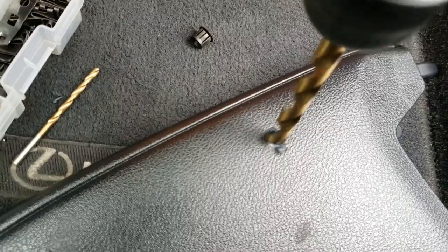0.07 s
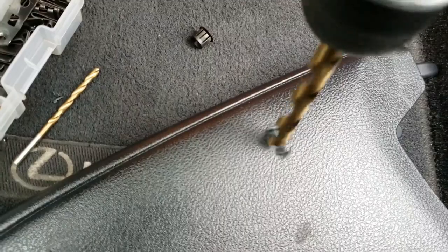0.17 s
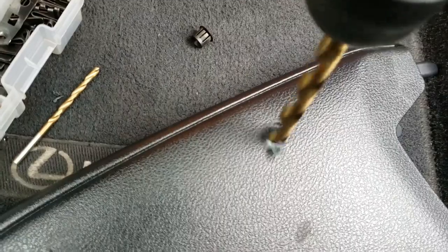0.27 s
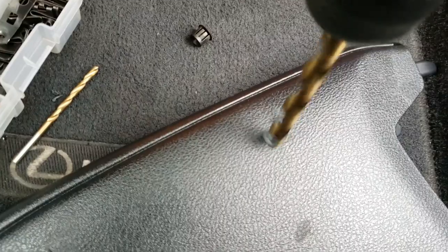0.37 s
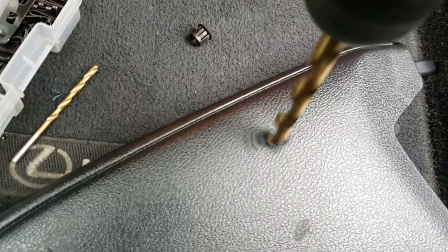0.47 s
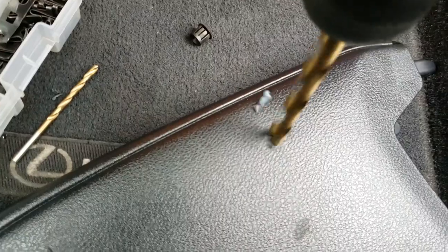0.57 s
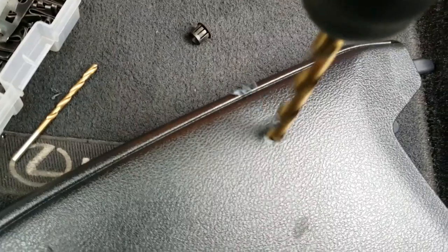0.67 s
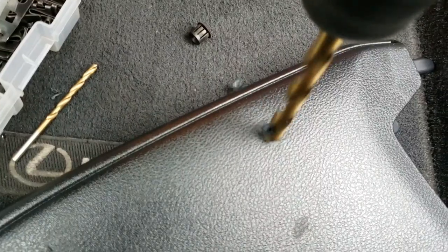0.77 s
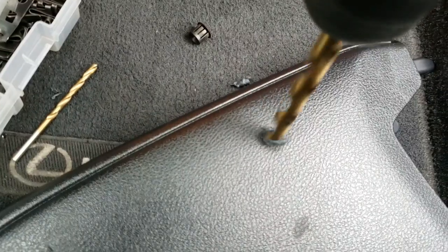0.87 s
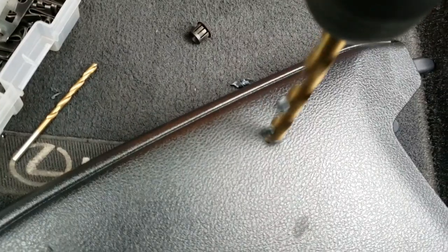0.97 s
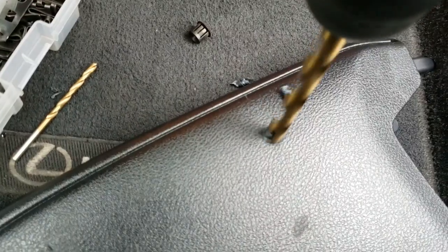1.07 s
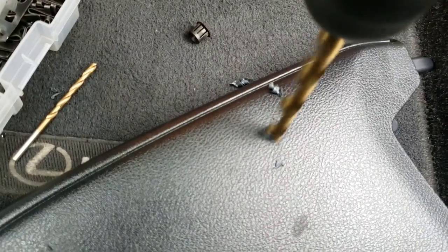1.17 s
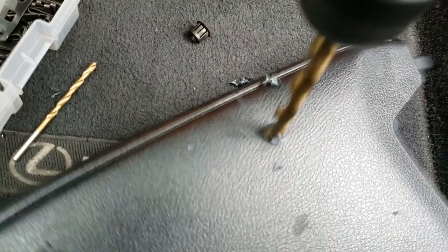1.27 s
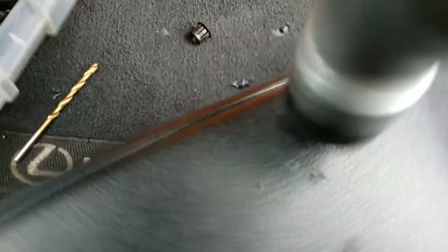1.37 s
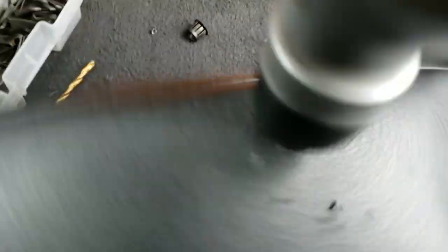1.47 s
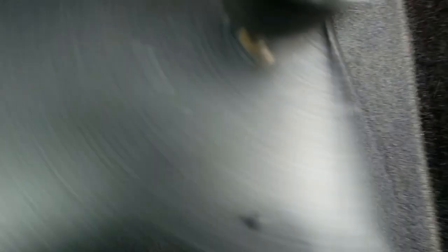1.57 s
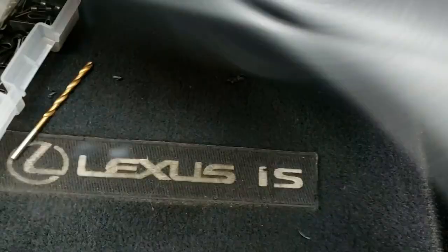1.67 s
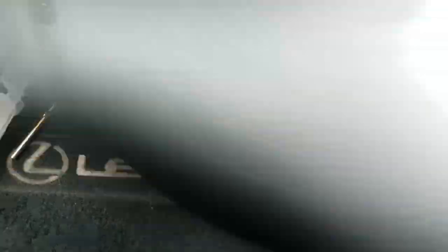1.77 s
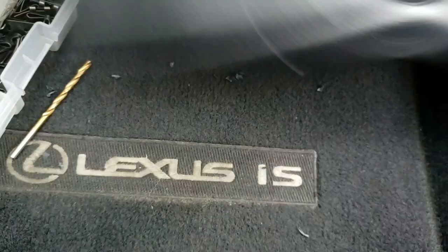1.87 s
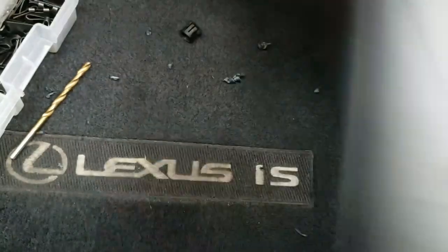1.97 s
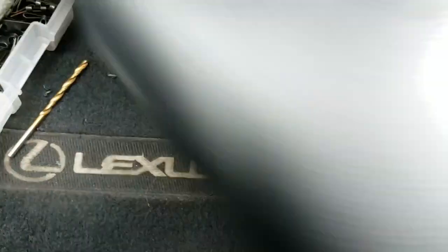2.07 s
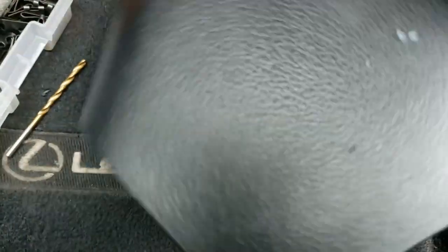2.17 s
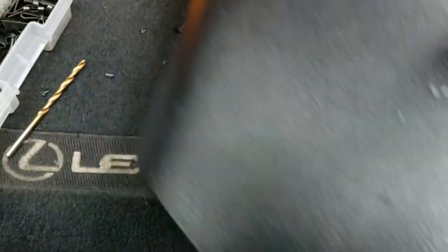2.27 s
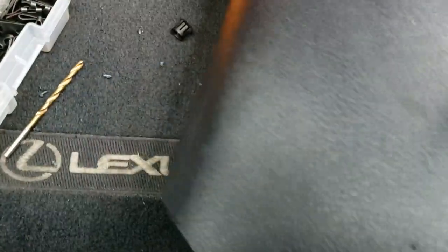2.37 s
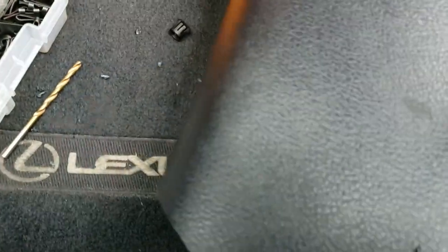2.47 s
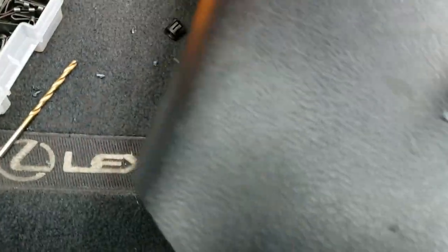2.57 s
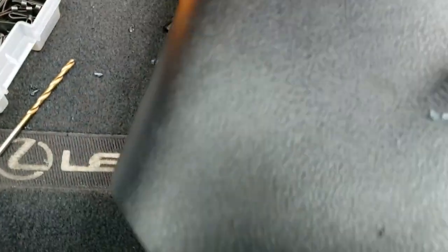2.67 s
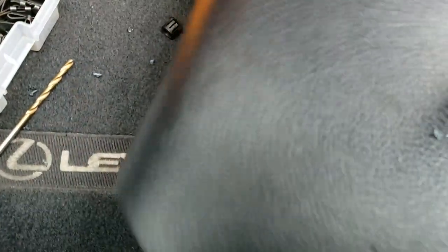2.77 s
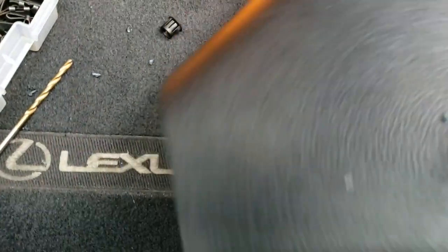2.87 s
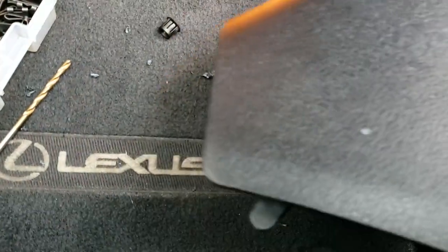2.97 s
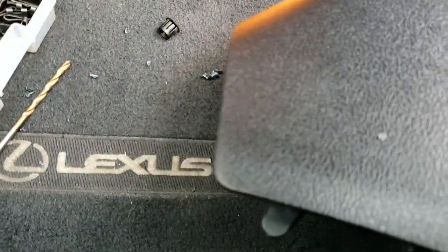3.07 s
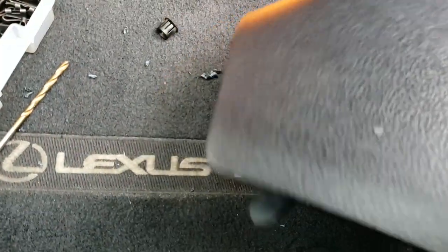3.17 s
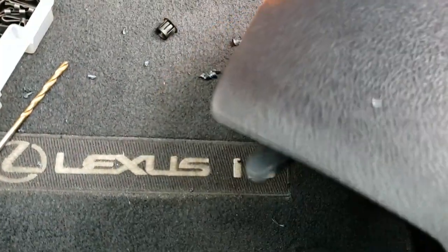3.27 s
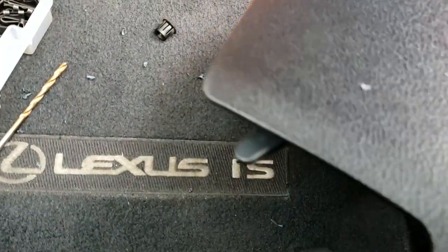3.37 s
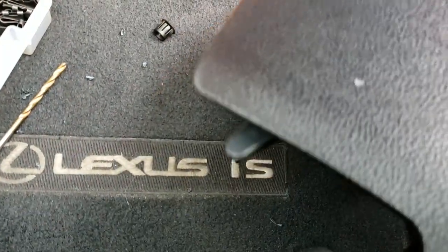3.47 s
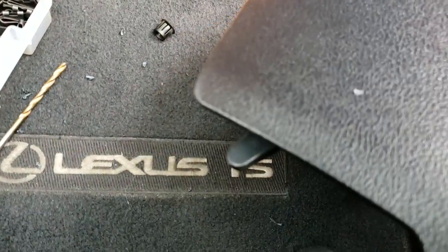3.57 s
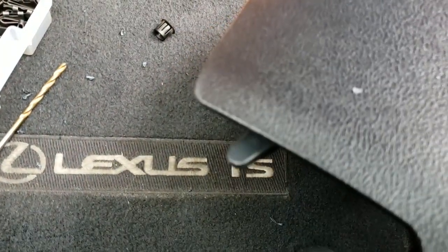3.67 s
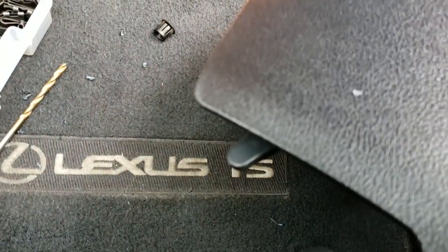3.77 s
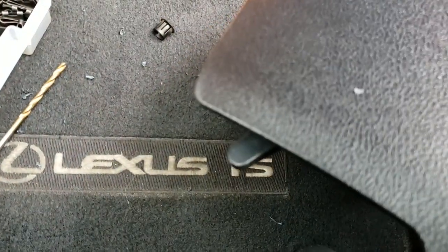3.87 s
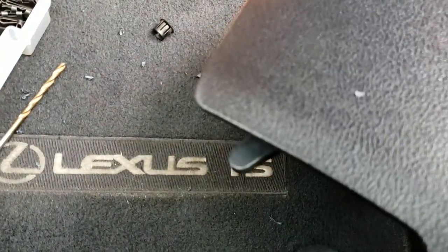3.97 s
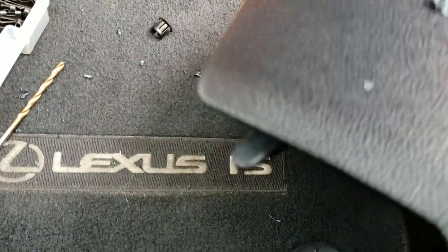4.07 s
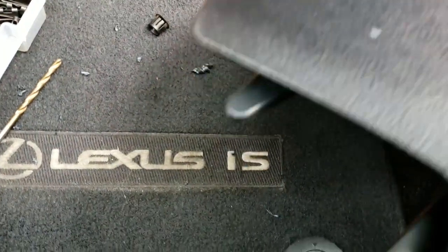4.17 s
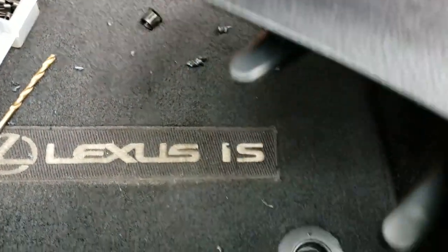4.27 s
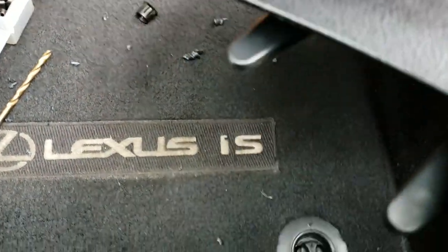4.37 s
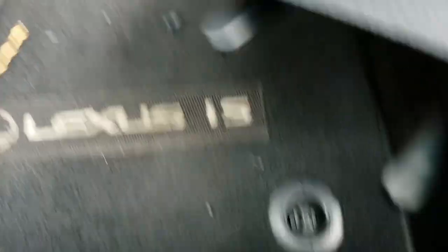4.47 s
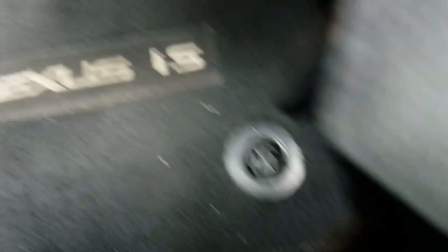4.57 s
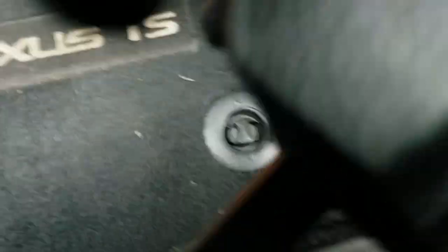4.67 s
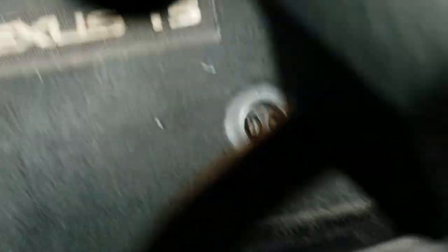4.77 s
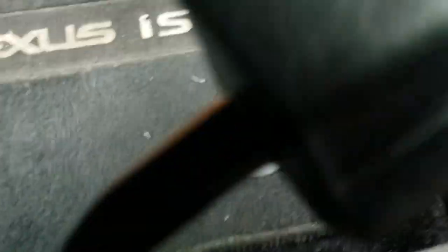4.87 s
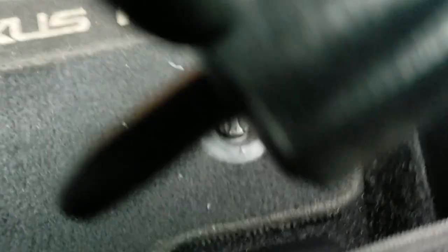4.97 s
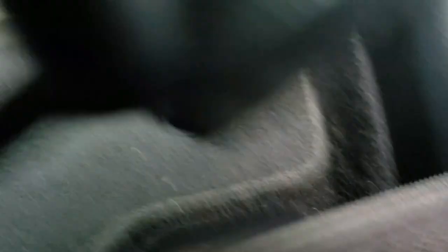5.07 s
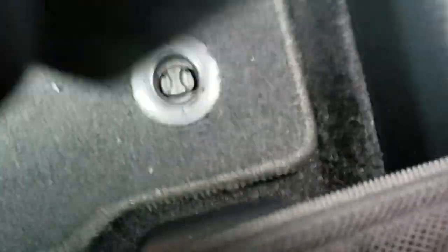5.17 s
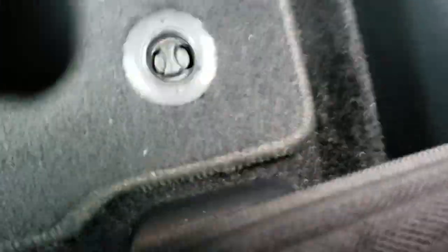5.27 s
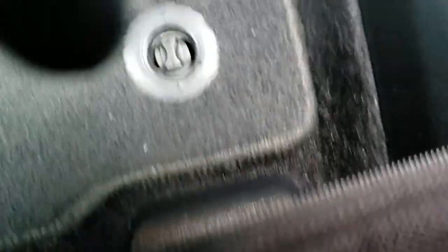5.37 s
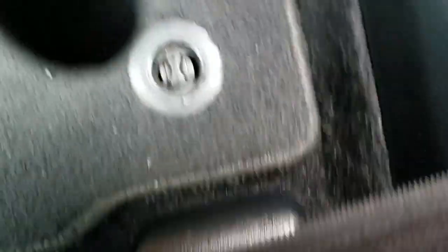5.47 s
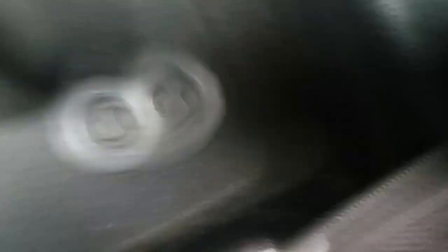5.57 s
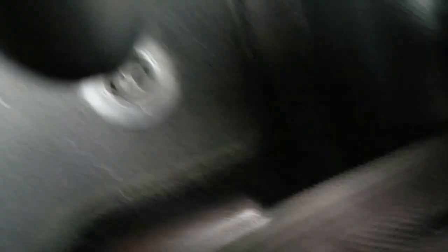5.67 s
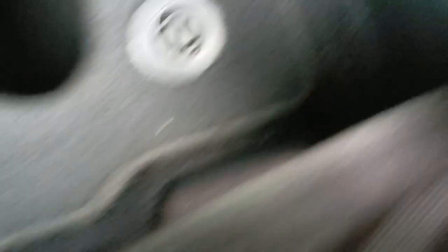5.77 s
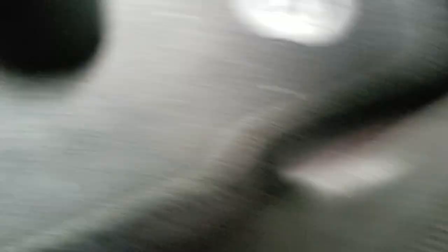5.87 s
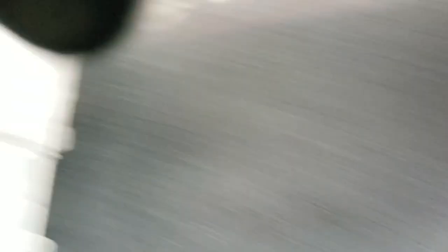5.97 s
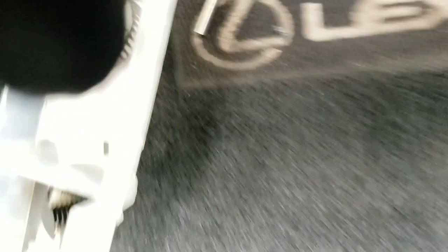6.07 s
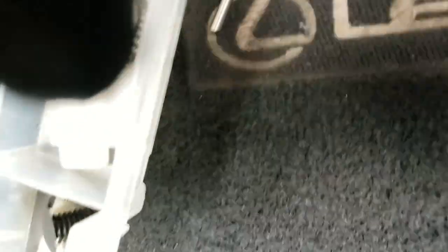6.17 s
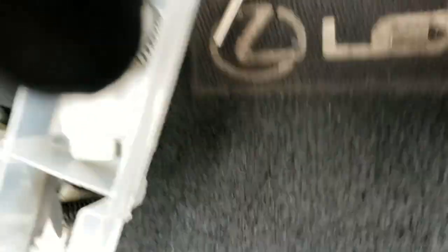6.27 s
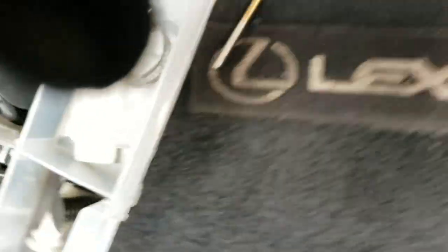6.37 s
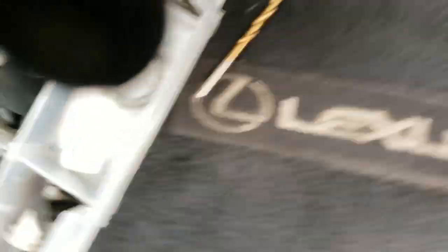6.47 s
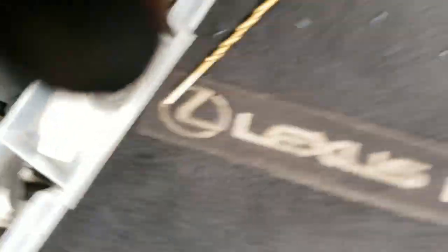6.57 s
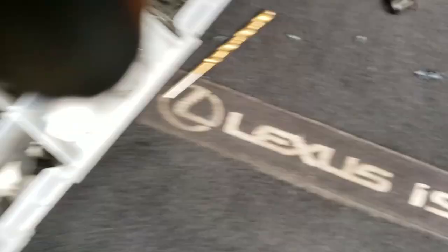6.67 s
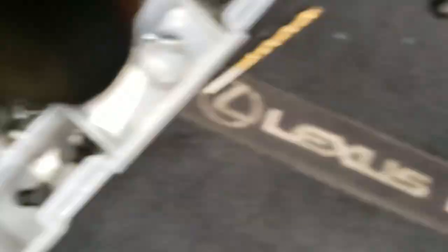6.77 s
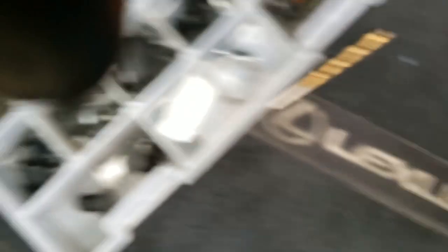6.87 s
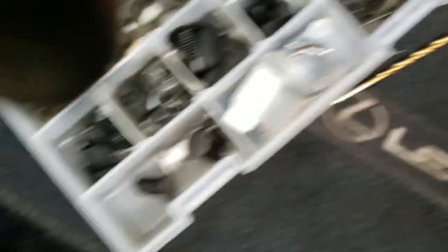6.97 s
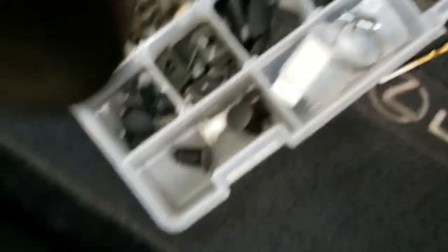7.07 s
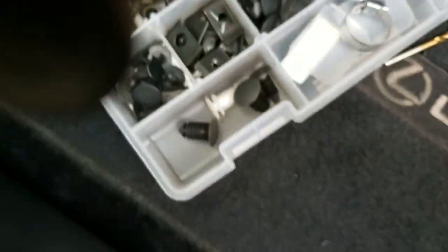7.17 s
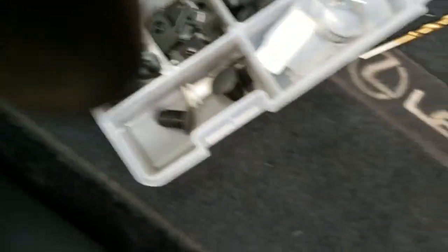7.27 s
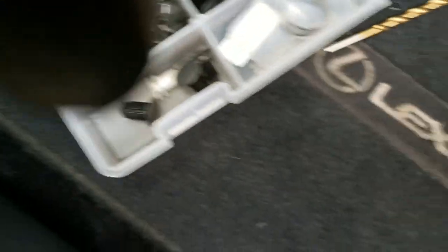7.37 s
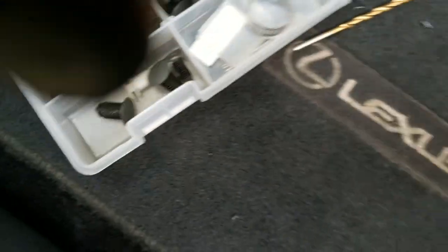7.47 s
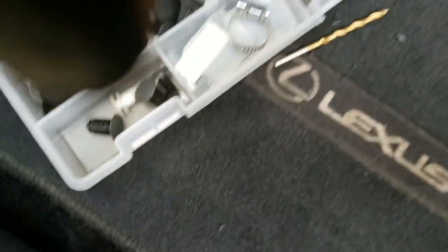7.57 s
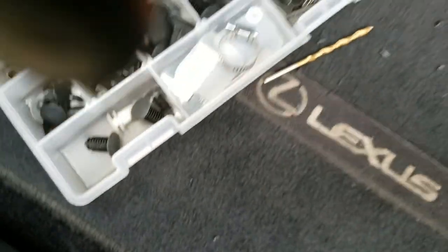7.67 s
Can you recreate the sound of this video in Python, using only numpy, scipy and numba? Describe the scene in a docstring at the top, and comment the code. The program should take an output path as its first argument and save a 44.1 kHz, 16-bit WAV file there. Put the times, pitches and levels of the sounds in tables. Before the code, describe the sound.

A drill bit chews plastic with rough crackling chips and gear rattle, air buffeting the nearby microphone. Hard plastic snaps follow as the load comes off, and the whine slides down to rest. Tiny buzzing clicks and a low grind lead into a longer free-spinning rev, a quick retrigger and a slow coast. A short burst with a knock comes later, then box rattling and one last abrupt rev, in a dry indoor space.

```python
"""A corded drill bores a plastic trim panel, coasts down, and is then revved several more times close by.
Gear rattle and hiss are noise pulsed by the turning teeth and commutator; gear tones are motor orders
swept through housing resonances. Random jerks ring the bit, the shaft squeals, fan air buffets the microphone.
Between runs, current pulses tick in the stalled motor and a slow crawl grinds.
Plastic knocks are noise cracks with damped modes, over a low hum, room noise and rustling."""
import sys
import numpy as np
from scipy import signal
from scipy.fft import rfft, irfft, next_fast_len
from scipy.io import wavfile
from scipy.ndimage import uniform_filter1d
from numba import njit

SR = 44100
rng = np.random.default_rng(int(sys.argv[2]) if len(sys.argv) > 2 else 0)


def wrap_up_sound(samples):
    """Save the sound to the file named by the first command line argument, as 16-bit audio."""
    columns = np.atleast_2d(samples).T
    # keep every value between -1 and 1, then stretch to whole-number steps
    tamed = np.clip(columns, -1, 1)
    steps = np.round(tamed * 32767).astype(np.int16)
    wavfile.write(sys.argv[1], SR, steps)


N = 339570
TIME_S = np.arange(N) / SR

# Levels in tables are relative unless a comment says otherwise.
# Room floor spectrum: (frequency [Hz], level per Hz [dB])
ROOM_SPECTRUM = [(12, -40), (20, -17.5), (49, -9.5), (88, -10.5), (107, -12), (123, -18), (241, -20.5),
                 (277, -31.5), (357, -25.5), (446, -36), (1120, -41), (1440, -40.5), (2080, -48),
                 (3000, -44.5), (4500, -60.5), (8650, -57), (16000, -56)]
# Hands on panel and parts box: (time [s], level [dB])
RUSTLE_LEVEL = [(4.95, -70.5), (5.18, -63), (6.3, -67), (6.5, -62.5), (6.7, -58), (6.95, -54),
                (7.05, -57.5), (7.18, -49.5), (7.33, -45.5), (7.42, -50.5)]
# Rustle spectrum: (frequency [Hz], level per Hz [dB])
RUSTLE_SPECTRUM = [(400, 3), (800, 0.5), (1200, -1), (2000, -3.5), (3000, 1), (5000, -5.5), (9000, -11),
                   (15000, -5.5)]

# Bumps through the hand to the microphone: (time [s], level [dB], frequency [Hz], t60 [s])
MIC_BUMPS = [(5.58, -12, 42.7, 0.087), (7.241, -19, 123, 0.022)]
# Plastic knocks: (time [s], clack [dB], clack tilt [dB/octave], snap [dB], thump [dB], L-R [dB])
PLASTIC_KNOCKS = [(1.592, -19, -6, -10, -33, 12), (1.689, -28, 5, -19, -44, 1),
                  (1.753, -21, -4, -18.5, -39, 8), (2.03, -31.5, -7, -53, -40, 1),
                  (2.957, -39.5, 6, -41, -56, -3), (3.306, -47, 3, -40, -51, -7),
                  (3.327, -40, -5, -40, -51, -3), (5.5766, -9.5, -0.5, -19, -22.5, -13),
                  (5.591, -13.5, -5, -23, -39, -2), (6.752, -35, 4, -43, -48, 2),
                  (6.8338, -22.5, -7, -16.5, -37, 6), (6.84, -18.5, -5.5, -27, -26.5, -3),
                  (6.875, -31, -6, -35.5, -33.5, 2), (6.976, -40, 0, -54, -50, 0),
                  (7.095, -53, -3, -43, -49, 1), (7.2314, -12, -6, -28, -28.5, 1.5),
                  (7.251, -18, -5.5, -37, -59, -3), (7.268, -20, 2, -35, -56, 14),
                  (7.275, -20, -2, -34, -62, 9), (7.291, -15.5, 0, -29.5, -39, 4)]
# Low panel modes: (frequency [Hz], level [dB], t60 [s])
PANEL_MODES = [(48, -19, 0.21), (102.2, 3, 0.23), (137.6, -3, 0.15), (186.6, 4.5, 0.09), (275, -3.5, 0.14),
               (396, -9, 0.081), (550, -16, 0.075), (595, -13, 0.12)]
# Hard, short upper modes of the plastic: (frequency [Hz], level [dB], t60 [s])
CLACK_MODES = [(372, -12, 0.028), (653, 2, 0.015), (953, -1, 0.02), (1380, -7, 0.032), (1750, -10.5, .02),
               (2440, -7, 0.013), (2980, 5, 0.014), (3450, -19, .016), (4020, -16, 0.012),
               (5030, -23, 0.02)]
# Broad crack of a blow: (frequency [Hz], level per Hz [dB])
SNAP_SPECTRUM = [(500, 2.5), (950, 1.5), (1300, -1.5), (1800, 5.5), (2100, 1), (2900, 6.5), (4000, 1.5),
                 (5000, -1), (5800, -9.5), (7600, -4.5), (9000, -12.5), (14000, -7)]
SNAP_T60_S, SNAP_TAIL_T60_S, SNAP_TAIL_DB = 0.026, 0.19, -20
CONTACT_S, CONTACT_RISE_DB = 0.0012, 0.5  # mean spacing; rise from one contact to the next

MAINS_HZ = 60
MAINS_PHASE_CYCLES = .44  # where the current peaks
# Runs of motor ticks at about mains rate: (first [s], last [s], level [dB])
TICK_RUNS = [(2.690, 2.690, -37), (2.7065, 2.7395, -29), (3.040, 3.189, -27), (5.174, 5.191, -37),
             (7.408, 7.424, -28)]
# Tick spectrum: (frequency [Hz], level per Hz [dB])
TICK_SPECTRUM = [(400, -7), (800, 1), (1900, -37), (2450, 0), (3000, 13), (4500, 1.5), (7500, 2.5),
                 (9000, -0.5), (12000, 7.5), (15000, 9.5)]
# Motor straining at a crawl: (time [s], level [dB])
STRAIN_LEVEL = [(2.7, -67.5), (2.86, -50.5), (3.0, -62), (3.1, -60), (3.3, -51), (3.45, -45), (3.55, -54)]
# Motor body resonances: (frequency [Hz], width per pass [Hz], level [dB])
BODY_MODES = [(320, 150, 13), (625, 320, 10), (1530, 400, 1.5), (2920, 320, 0.5)]
# Modes excited by mains pulses: (frequency [Hz], width per pass [Hz], level [dB])
HUM_MODES = [(368, 52, -68), (873, 67, -69)]
HUM_START_S, HUM_END_S = 2.69, 3.32
GRIND_PER_S, GRIND_T60_S = 130, 0.017
GRIND_SMOOTH = .5  # even grinding, as a share of the tooth ticks' rms

# Fan air over the microphone: (from [s], to [s], buffet [dB], rush [dB], L-R [dB])
AIR_GUSTS = [(0.0, 0.49, -28, -43.5, 2), (0.466, 1.568, -25, -39, 12), (1.246, 1.364, -19, -29, 22),
             (1.505, 1.56, -30, -28.5, 24), (3.414, 3.72, -35.5, -39, -20), (3.691, 3.755, -30.5, -26, -31),
             (3.766, 3.993, -56, -25.5, -37), (3.964, 4.122, -55, -30, -36), (4.114, 4.408, -57, -49, -22),
             (5.307, 5.566, -48, -44.5, 5), (5.657, 5.748, -42, -32.5, -8), (5.776, 5.983, -42, -53, -3.5),
             (7.452, 7.7, -34.5, -43.5, -1.5)]
GUST_ATTACK_S, GUST_RELEASE_S = .035, 0.046  # linear rise; exponential time constant
# Buffet spectrum: (frequency [Hz], level per Hz [dB])
BUFFET_SPECTRUM = [(12, -50.5), (20, -21), (75, 4), (115, -3), (220, -12), (290, -26), (480, -120)]
# Rush spectrum: (frequency [Hz], level per Hz [dB])
RUSH_SPECTRUM = [(90, -13.5), (170, -1), (330, -1.5), (520, -4), (800, -5), (1400, -16)]

# Shaft and bit squeals: (start [s], start pitch [Hz], end pitch [Hz], length [s], level [dB])
SHAFT_SQUEALS = [(0.07, 764, 803, 0.1, -31), (1.205, 2730, 2930, 0.043, -21.5),
                 (1.255, 3380, 3040, 0.08, -28), (1.516, 3300, 3620, 0.024, -33.5),
                 (1.592, 1940, 1690, 0.012, -29), (1.609, 2910, 3020, 0.012, -32),
                 (1.68, 1690, 1680, 0.0065, -30), (3.756, 2990, 2860, 0.032, -24.5),
                 (4.211, 2920, 3070, 0.091, -36.5), (4.343, 3040, 2970, 0.12, -36.5),
                 (5.295, 2800, 2970, 0.048, -32.5), (5.428, 2940, 2740, 0.045, -39),
                 (5.49, 2354, 2620, 0.076, -40.5), (5.633, 3100, 2670, 0.11, -36.5),
                 (5.765, 2790, 2770, 0.027, -40), (7.482, 2870, 2800, 0.02, -29.5),
                 (7.495, 848, 1100, 0.053, -32), (7.68, 2880, 2900, 0.018, -33)]
# How hard the bit bites: (time [s], level [dB])
BITE_LEVEL = [(.08, -25), (.25, -29), (.6, -26.5), (.76, -21), (1.0, -26.5), (1.15, -23), (1.4, -25),
              (1.6, -42.5), (1.63, -38)]
# Bit resonances: (frequency [Hz], width before BIT_WIDENING [Hz], level [dB])
BIT_MODES = [(2563, 240, 5.5), (3067, 130, 2), (3265, 130, 4), (3530, 68, -1), (4390, 290, -1.5),
             (4840, 200, -4.5)]
BIT_WIDENING = 1.1
CHIPS_PER_S, CHIP_SPREAD_DB, CHIP_T60_S = 420, 4.5, .012

# Trigger pulls: (pressed [s], eased [s], gear tone the motor heads for [Hz], lag [s])
TRIGGER_PULLS = [(-.08, 1.19, 476, .38), (1.19, 1.49, 932, .1), (2.75, 2.945, 58, .06),
                 (3.2, 3.31, 95, .04), (3.34, 3.75, 795, .29), (3.75, 4.04, 1000, .15),
                 (4.24, 4.36, 934, .1), (5.21, 5.54, 945, .095), (7.43, 7.7, 470, .13)]
FRICTION_HZ_PER_S, DRAG_PER_S = 845, .95  # dry friction; drag in proportion to speed
FULL_HZ, CRAWL_HZ, STICK_HZ = 900, 55, 48  # full speed; level held below; fade to rest below
# Loudness from pressing on or holding near, before each part's share: (time [s], gain [dB])
LOAD_GAIN = [(0, 8.5), (.07, 15.5), (.27, 17), (.6, 12), (1.17, 9), (1.28, 5.5), (1.45, 6), (1.6, 4.5),
             (1.65, 4), (1.85, 2), (2.15, -2.5), (2.87, -2.5), (3.38, -3.5), (3.75, 4), (4.0, -2.5),
             (4.95, -2), (5.21, -1), (5.245, -1), (5.3, -1.5), (5.7, 1), (5.82, 0.5), (6.02, -4),
             (6.15, -1.5), (7.43, 5), (7.445, 12), (7.465, 15), (7.49, 17), (7.7, 3)]
# Where the vent points: (time [s], extra hiss before each part's share [dB], L-R [dB])
VENT_AIM = [(0, -0.5, -0.5), (1.25, 3.5, 1.5), (1.57, 2, 8), (1.66, 0, -0.5), (2.2, 5, -3),
            (3.64, 3.5, -9.5), (3.74, 6, -11), (3.97, 8.5, -15.5), (4.37, 6, -6), (4.75, 1.5, 2.5),
            (5.3, 0.5, 0.5), (5.53, 0, 2), (5.66, -0.5, -3), (6.0, 4.5, 4), (7.48, -0.5, -0.5),
            (7.7, 2.5, 2)]
# Part laws: (full speed [dB], speed slope [dB/octave], full torque [dB], load share, vent hiss share)
GEAR_GAIN_LAW = (-36.5, 8, 11, 1.0864, 0.3058)
SHELL_GAIN_LAW = (-32, 6.5, -3, 1.36, 0.71)
BRUSH_GAIN_LAW = (-31.5, 9.5, 3, 1.3851, 1.88)
FAN_GAIN_LAW = (-31, 8.5, 4, 1.0058, .5)
# Gearbox position: (time [s], L-R [dB])
GEARBOX_PAN = [(0, 13.5), (1.2, 10.5), (1.6, 20.5), (2.1, 6), (3.6, 5.5), (4.4, 8), (5.7, 3.5), (7.5, 8)]
GEARBOX_SHARE, VENT_SHARE = 0.28, 0.16  # gear pan as shares of gearbox and vent L-R
# Gear rattle spectrum: (frequency [Hz], level per Hz [dB])
GEAR_SPECTRUM = [(200, -15.5), (420, -10.5), (620, -1.5), (800, -1), (1030, -7), (1200, -3.5), (1380, -0.5),
                 (1600, 2), (1850, 1.5), (2100, -0.5), (2400, 3), (3900, -5), (5000, -16)]
# Brush hiss spectrum: (frequency [Hz], level per Hz [dB])
BRUSH_SPECTRUM = [(5000, -25.5), (7800, -3), (8900, -5.5), (10300, -1.5), (11600, 2.5), (12700, 1),
                  (14000, -3), (16000, -1)]
# Fan hiss spectrum: (frequency [Hz], level per Hz [dB])
FAN_SPECTRUM = [(3300, -7), (4100, 0), (4500, -1.5), (5200, -1), (6200, -5), (7000, -3.5), (7700, -5.5),
                (8800, -17.5), (10000, -18.5)]
# Gear tones: (multiple of speed [ratio], level [dB], flutter [dB])
GEAR_ORDERS = [(.62, -11, 4), (1, 1, 2.5), (1.6, -8, 5), (1.93, -10, 5), (2, 0.5, 2.6), (3, -7, 5),
               (4, -5, 5), (4.63, -9, 5), (5.95, -8, 5)]
# Housing radiation: (frequency [Hz], gain [dB])
HOUSING_RESPONSE = [(150, -34), (400, -30), (480, -15), (580, -4), (680, -4.5), (790, 1.5), (870, -3),
                    (940, -6), (1020, -13), (1130, -9), (1300, -20), (1600, -15), (1780, -26), (2150, -30),
                    (2600, -23), (2950, -14), (3300, -24), (3500, -24), (5000, -11)]
BREAKUP_HZ, BREAKUP_DB = 950, 4.5  # extra flutter per octave above this pitch, up to one octave
# Gear tones over rattle: (time [s], gain before torque loss [dB])
SING_GAIN = [(.3, -7), (.48, -2), (.61, 6), (.8, 4.5), (.98, 0.5), (1.17, 1.5), (1.3, 0), (1.45, -3),
             (1.7, -1), (1.9, 4), (2.1, 5), (3.5, -2), (3.66, 4), (3.8, -4), (4.0, -3), (4.12, 4.5),
             (4.38, 3), (4.6, 2), (4.9, 7), (5.3, -4), (5.42, 1), (5.53, -2), (5.62, 1.5), (5.8, -4),
             (5.95, -1), (7.5, -8)]
SING_LOSS_DB = 1.5  # at full torque
# Gearbox shell resonances: (frequency [Hz], width per pass [Hz], level [dB])
SHELL_MODES = [(2510, 155, 1.5), (2780, 260, 2), (3028, 390, 7), (3280, 900, 2.5), (4530, 540, -2.5)]
# Shell ringing as the grip changes: (time [s], gain [dB], pitch factor [ratio])
SHELL_GRIP = [(.3, 0.5, 1.0), (.6, -3, 1.01), (1.1, 1, 1.02), (1.55, 0.5, 1.01), (1.9, 3, .98),
              (3.5, 7.5, 1.01), (3.95, -6, .99), (4.2, 0.5, 1.02), (4.42, -0.5, 1.01), (4.6, -2, 1.0),
              (5.4, -7.5, .94), (5.9, -0.5, .96), (7.5, 0.5, .96)]
SHELL_WAVER, SHELL_FLICKER_DB = 0.022, 1.2  # rms pitch share; rms level
# Narrow hollow in the drill's tone: (time [s], depth [0-1])
HOLLOW_DEPTH = [(1.6, .5), (2.2, 0), (4.5, 0.77), (5.2, 0.44), (6.1, 0.2), (7.5, 0.34)]
HOLLOW_HZ, HOLLOW_WIDTH_HZ = 2070, 240
CUTOFF_HZ = 15900


def amp(db):
    """Decibels to gain."""
    return 10 ** (np.asarray(db) / 20)


def rms_one(x):
    """Scale to unit power."""
    return x / np.sqrt(np.mean(x ** 2) + 1e-20)


def in_time(rows):
    """Columns of a curve, at every sample."""
    times_s, *columns = np.transpose(rows)
    return [np.interp(TIME_S, times_s, c) for c in columns]


def in_span(rows):
    """Gain from a dB curve, silent outside it."""
    edge_s = .02
    start_s, end_s = rows[0][0], rows[-1][0]
    gate = np.interp(TIME_S, [start_s - edge_s, start_s, end_s, end_s + edge_s], [0, 1, 1, 0])
    return amp(in_time(rows)[0]) * gate


def at_hz(points, hz):
    """Gain of a spectrum at given frequencies, falling 20 dB/octave more past its ends."""
    f, db = np.transpose(points)
    octave = np.log2(np.maximum(hz, 1))
    below = np.maximum(np.log2(f[0]) - octave, 0)
    above = np.maximum(octave - np.log2(f[-1]), 0)
    return amp(np.interp(octave, np.log2(f), db) - 20 * (below + above))


def coloured(x, spectrum):
    """Filter by a spectrum, then scale to unit power."""
    length = x.shape[-1]
    size = next_fast_len(length)
    shaped = rfft(x, size) * at_hz(spectrum, np.fft.rfftfreq(size, 1 / SR))
    return rms_one(irfft(shaped, size)[..., :length])


def noise(alike=0., size=N):
    """White stereo noise with a given left-right correlation."""
    mid, side = rng.standard_normal((2, size))
    return np.sqrt(1 + alike) * mid + np.sqrt(1 - alike) * side * np.array([[1], [-1]])


def drift(rate_hz):
    """Interpolated random values with unit rms."""
    return rms_one(np.interp(TIME_S * rate_hz, np.arange(8192), rng.standard_normal(8192)))


def panned(side_db):
    """Left and right gains for a level difference."""
    gains = amp(np.array([[.5], [-.5]]) * side_db)
    return gains / np.sqrt(np.mean(gains ** 2, axis=0))


def resonance(x, hz, width_hz):
    """Two-pole resonance with about unit peak gain."""
    r = np.exp(-np.pi * width_hz / SR)
    zeros = np.array([1, 0, -1]) * (1 - r * r) / 2
    return signal.lfilter(zeros, [1, -2 * r * np.cos(2 * np.pi * hz / SR), r * r], x)


def twice_resonant(x, hz, width_hz):
    """Two passes through one resonance, for steeper skirts."""
    return resonance(resonance(x, hz, width_hz), hz, width_hz)


@njit
def moving_resonance(x, hz, width_hz):
    """Two-pole resonance whose centre follows a curve."""
    r = np.exp(-np.pi * width_hz / SR)
    y = np.zeros_like(x)
    for i in range(2, x.shape[1]):
        pull = 2 * r * np.cos(2 * np.pi * hz[i] / SR)
        for c in range(x.shape[0]):
            drive = (1 - r * r) / 2 * (x[c, i] - x[c, i - 2])
            y[c, i] = drive + pull * y[c, i - 1] - r * r * y[c, i - 2]
    return y


def dying(times_s, gains, t60_s):
    """Envelope that jumps at each blow and decays exponentially."""
    blows = np.zeros(N)
    blows[(np.asarray(times_s) * SR).astype(int)] = gains
    return signal.lfilter([1], [1, -amp(-60 / (t60_s * SR))], blows + 1e-18)


def mains_pulse():
    """Swing of the current, from -1 to 1."""
    return np.cos(2 * np.pi * (MAINS_HZ * TIME_S - MAINS_PHASE_CYCLES))


def background():
    """Narrow-band noise wavers as a low hum over the room floor; shaped noise rustles like hands on a box."""
    room = amp(-53) * coloured(noise(0.53), ROOM_SPECTRUM)
    hum = amp(-53) * rms_one(twice_resonant(noise(0.78), 86., 22.))
    rough = noise(0.055) * amp(0.74 * drift(200))
    rustle = in_span(RUSTLE_LEVEL) * coloured(rough, RUSTLE_SPECTRUM) * panned(5.0)
    return room + hum + rustle


def bump():
    """Deep, quickly damped swings of the microphone."""
    out = 0
    for start_s, db, hz, t60_s in MIC_BUMPS:
        age_s = np.clip(TIME_S - start_s, 0, 1)
        out = out + amp(db - 60 * age_s / t60_s) * np.sin(2 * np.pi * hz * age_s)
    return out


def clack(age_s, tilt_db, count=4):
    """A few quick contacts ring the upper modes; tilt sets their balance about 1500 Hz."""
    contacts = np.zeros(len(age_s))
    delays_s = np.cumsum(CONTACT_S * rng.uniform(.5, 1.5, count))
    at = ((delays_s - delays_s[0]) * SR).astype(int)
    contacts[at] = amp(CONTACT_RISE_DB * np.arange(count)) * rng.choice([-1, 1], count)
    out = 0
    for hz, db, t60_s in CLACK_MODES:
        detuned_hz = hz * (1 + .025 * rng.normal())
        phase = 2 * np.pi * detuned_hz * age_s + rng.normal(0, .6, (2, 1))
        mode = amp(-60 * age_s / t60_s) * np.sin(phase)
        struck = signal.fftconvolve(mode, contacts[None], axes=1)[:, :len(age_s)]
        # keep the power of a single contact
        out = out + amp(db + tilt_db * np.log2(hz / 1500)) * rms_one(struck) * np.std(mode)
    return out


def thump(age_s, thump_db):
    """Damped low panel modes with random strength and polarity."""
    out = 0
    for hz, mode_db, t60_s in PANEL_MODES:
        fade = amp(thump_db + mode_db + 2 * rng.normal() - 60 * age_s / t60_s)
        out = out + fade * np.sin(2 * np.pi * hz * age_s) * rng.choice([-1, 1])
    return out


def knocks():
    """Each plastic blow: broad noise crack, ringing clack and low panel modes together."""
    out, age_s = np.zeros((2, N)), TIME_S[:SR // 3]
    snap_tail = amp(SNAP_TAIL_DB - 60 * age_s / SNAP_TAIL_T60_S)
    snap_fade = amp(-60 * age_s / SNAP_T60_S) + snap_tail
    for start_s, clack_db, tilt_db, snap_db, thump_db, side_db in PLASTIC_KNOCKS:
        snap = amp(snap_db) * snap_fade * coloured(noise(0.052, size=len(age_s)), SNAP_SPECTRUM)
        ring = amp(clack_db - 11) * clack(age_s, tilt_db)
        blow = (snap + thump(age_s, thump_db) + ring) * panned(side_db)
        at = int(start_s * SR)
        out[:, at:at + len(age_s)] += blow[:, :N - at]
    return out


def ticks():
    """Short current pulses jolt the stalled motor, which answers partly alike every time."""
    jolts = np.zeros((1, N))
    for first_s, last_s, db in TICK_RUNS:
        times_s = np.linspace(first_s, last_s, round(abs(last_s - first_s) * MAINS_HZ) + 1)
        jolts[0, (times_s * SR).astype(int)] = amp(db + 1.5 * rng.standard_normal(len(times_s)))
    age_s = TIME_S[:2048]
    fade = amp(-60 * age_s / .024) + amp(3 - 60 * age_s / .004)
    answer = fade * coloured(noise(size=2048), TICK_SPECTRUM)
    alike = signal.oaconvolve(jolts, answer, axes=1)[:, :N]
    fresh = signal.oaconvolve(jolts[0], fade)[:N] * coloured(noise(), TICK_SPECTRUM)
    return amp(-15) * (alike + fresh) * panned(-1.5)


def strain():
    """At a crawl, random tooth ticks grind in the motor body; mains pulses excite a steady hum."""
    times_s = np.flatnonzero(rng.random(N) < GRIND_PER_S / SR) / SR
    forces = amp(4 * np.clip(rng.standard_normal(len(times_s)), -2, 1.7))
    grains = rms_one(dying(times_s, forces, GRIND_T60_S))
    grind = noise(0.23) * (grains + GRIND_SMOOTH)
    body = sum(amp(db) * twice_resonant(grind, hz, width_hz) for hz, width_hz, db in BODY_MODES)
    cycle = np.floor(MAINS_HZ * TIME_S - MAINS_PHASE_CYCLES)
    pulses = np.diff(cycle, prepend=-1) * amp(3 * drift(60))
    hum = sum(amp(db) * rms_one(twice_resonant(pulses, hz, width_hz)) for hz, width_hz, db in HUM_MODES)
    hum_gate = in_span([(HUM_START_S, 0), (HUM_END_S, 0)])
    return in_span(STRAIN_LEVEL) * rms_one(body) + hum * hum_gate


def draught():
    """Fan air on the microphone: low buffeting noise and a lumpy rush, in gusts."""
    buffet_power, rush_power = 0, 0
    for start_s, end_s, buffet_db, rush_db, side_db in AIR_GUSTS:
        rise = np.clip((TIME_S - start_s) / GUST_ATTACK_S, 0, 1)
        fall = np.exp(-np.clip(TIME_S - end_s, 0, 1) / GUST_RELEASE_S)
        gust = rise * fall * panned(side_db)
        buffet_power = buffet_power + (amp(buffet_db) * gust) ** 2
        rush_power = rush_power + (amp(rush_db) * gust) ** 2
    buffet = amp(-2.0) * np.sqrt(buffet_power) * coloured(noise(0.5), BUFFET_SPECTRUM)
    lumpy = noise(0.084) * amp(2.7 * drift(120))
    rush = amp(1.5) * np.sqrt(rush_power) * coloured(lumpy, RUSH_SPECTRUM)
    return buffet + rush


def squeals():
    """Shaft and bit grab: brief gliding tones with rough phase and level."""
    out = np.zeros(N)
    for start_s, from_hz, to_hz, length_s, db in SHAFT_SQUEALS:
        part = np.clip((TIME_S - start_s) / length_s, 0, 1)
        pitch_hz = from_hz + (to_hz - from_hz) * part
        phase = 2 * np.pi * np.cumsum(pitch_hz) / SR + 1.1 * drift(330)
        out += amp(db) * np.sqrt(np.abs(np.sin(np.pi * part))) * np.sin(phase)
    return out * amp(6.0 + 3.9 * drift(200)) * panned(5.4)


def cutting():
    """Chips tear off at uneven moments; each noisy jerk rings the bit."""
    times_s = np.flatnonzero(rng.random(N) < CHIPS_PER_S / SR) / SR
    forces = amp(CHIP_SPREAD_DB * np.clip(rng.standard_normal(len(times_s)), -2, 1.7))
    jerks = dying(times_s, forces, CHIP_T60_S)
    tearing = noise(0.05) * jerks * amp(1.5 * mains_pulse())
    ringing = 0
    for hz, width_hz, db in BIT_MODES:
        ringing = ringing + amp(db) * twice_resonant(tearing, hz, BIT_WIDENING * width_hz)
    return in_span(BITE_LEVEL) * rms_one(ringing) * panned(3.5)


def motor():
    """Speed (Hz of gear tone) nears each goal exponentially, then coasts; torque fades on approach."""
    speed_hz, torque = np.ones(N), np.zeros(N)
    brake_hz = FRICTION_HZ_PER_S / DRAG_PER_S
    for pressed_s, eased_s, goal_hz, lag_s in TRIGGER_PULLS:
        start_hz = speed_hz[max(int(pressed_s * SR), 0)]
        held_s = np.clip(TIME_S, pressed_s, eased_s) - pressed_s
        rising = goal_hz + (start_hz - goal_hz) * np.exp(-held_s / lag_s)
        decay = np.exp(-DRAG_PER_S * np.maximum(TIME_S - eased_s, 0))
        coasting = (rising + brake_hz) * decay - brake_hz
        speed_hz = np.where(TIME_S >= pressed_s, np.maximum(coasting, 1), speed_hz)
        pulling = (TIME_S >= pressed_s) & (TIME_S < eased_s)
        torque = np.where(pulling, (1 - rising / goal_hz) ** 2, torque)
    return speed_hz, uniform_filter1d(torque, size=1000)


def part_gain(law, speed_hz, torque):
    """Part level follows speed, torque, load and vent aim, and fades out towards rest."""
    full_db, octave_db, torque_db, load_share, vent_share = law
    db = full_db + octave_db * np.log2(np.maximum(speed_hz, CRAWL_HZ) / FULL_HZ)
    db = db + torque_db * torque
    db = db + load_share * in_time(LOAD_GAIN)[0] + vent_share * in_time(VENT_AIM)[0]
    return amp(db) * np.minimum(speed_hz / STICK_HZ, 1)


def meshing(turns, uneven_db, sharpness):
    """Once a cycle the teeth strike with random force, decaying until the next strike."""
    force = amp(uneven_db * np.clip(rng.standard_normal(N), -3, 3))
    return rms_one(force[turns.astype(int)] * np.exp(-sharpness * (turns % 1)))


def tooth_errors(speed_hz, turns, count=112):
    """Tooth flaws repeat: a dense comb of gliding partials, as loud per Hz as white noise."""
    steps, cycles = 8192, 8  # samples and gear-tone cycles in one round
    strengths = amp(3.5 * np.clip(rng.standard_normal(count), -2, 1.5))
    flaws = strengths * np.exp(2j * np.pi * rng.random((2, count)))
    one_round = rms_one(irfft(np.pad(flaws, ((0, 0), (1, 0))), steps))
    at = (turns / cycles * steps).astype(int) % steps
    return one_round[:, at] * np.sqrt(2 * count * speed_hz / cycles / SR)


def gear_tones(speed_hz, turns, jitter_turns):
    """Motor orders sweep through housing resonances; flutter deepens at high pitch."""
    out, sway = 0, jitter_turns * drift(70)
    for order, level_db, flutter_db in GEAR_ORDERS:
        cycles = order * (turns + sway) + rng.random()
        phase = 2 * np.pi * cycles + np.array([[.5], [-.5]])
        octaves = np.clip(np.log2(order * speed_hz / BREAKUP_HZ), 0, 1)
        depth_db = flutter_db + BREAKUP_DB * octaves
        flutter = depth_db * np.clip(.7 * drift(35) + .7 * drift(140), -2, 1.2)
        radiated = at_hz(HOUSING_RESPONSE, order * speed_hz)
        out = out + amp(level_db + flutter) * radiated * np.sin(phase)
    return out


def gearbox_shell(strikes):
    """Shell resonances ring under the teeth, wavering in pitch and strength with the grip."""
    ring_db, pitch = in_time(SHELL_GRIP)
    out = 0
    for hz, width_hz, db in SHELL_MODES:
        centre_hz = hz * pitch * (1 + SHELL_WAVER * drift(16))
        once = moving_resonance(strikes, centre_hz, float(width_hz))
        twice = moving_resonance(once, centre_hz, float(width_hz))
        out = out + amp(db + SHELL_FLICKER_DB * drift(18)) * twice
    return amp(ring_db) * rms_one(out)


def whine(speed_hz, turns):
    """Commutator whistle, a rough high order that fades in near full speed."""
    wander = .9 * drift(300) + .4 * np.array([drift(90), drift(90)])
    phase = 2 * np.pi * 14.66 * turns + wander
    near_full = np.clip((speed_hz - 630) / 150, 0, 1)
    return amp(6.5 + 3.5 * drift(110)) * near_full * np.sin(phase)


def drill():
    """Gear rattle and tones, ringing shell, fan and brush hiss, all turning with the motor."""
    speed_hz, torque = motor()
    turns = np.cumsum(speed_hz) / SR  # gear-tone cycles
    gear_gain = part_gain(GEAR_GAIN_LAW, speed_hz, torque)
    shell_gain = part_gain(SHELL_GAIN_LAW, speed_hz, torque)
    brush_gain = part_gain(BRUSH_GAIN_LAW, speed_hz, torque)
    fan_gain = part_gain(FAN_GAIN_LAW, speed_hz, torque)
    vent_pan_db = in_time(VENT_AIM)[1]
    shell_pan_db = in_time(GEARBOX_PAN)[0]
    gear_pan_db = GEARBOX_SHARE * shell_pan_db + VENT_SHARE * vent_pan_db
    fan_pan_db = 0.083 * shell_pan_db + 0.26 * vent_pan_db

    # mains throb only while the motor speeds up
    driven = uniform_filter1d((np.gradient(speed_hz) > 0) * 1., size=1000)
    throb = amp(0.8 * driven * mains_pulse() + drift(90))
    teeth = 1.09 * throb * meshing(turns, uneven_db=1.0, sharpness=0.67)
    flaws = 1.25 * throb * tooth_errors(speed_hz, turns + .02 * drift(80))
    rattle = amp(8.0) * coloured(noise(-0.17) * teeth + flaws, GEAR_SPECTRUM)
    strikes = (noise(-0.12) * teeth + flaws) * amp(1.9 * drift(140))
    fan = amp(2.5) * coloured(noise(-0.081) * teeth + 0.16 * flaws, FAN_SPECTRUM)
    commutation = throb * meshing(2 * turns, uneven_db=1.5, sharpness=0.8)
    brushes = coloured(noise(0.026) * commutation, BRUSH_SPECTRUM)
    sing = amp(in_time(SING_GAIN)[0] - SING_LOSS_DB * torque)
    tones = sing * gear_tones(speed_hz, turns, jitter_turns=.042)

    gears = gear_gain * (rattle + tones) * panned(gear_pan_db)
    shell = shell_gain * gearbox_shell(strikes) * panned(shell_pan_db)
    air = fan_gain * fan * panned(fan_pan_db)
    hiss = brush_gain * brushes * panned(vent_pan_db)
    return gears + shell + air + hiss + gear_gain * whine(speed_hz, turns)


def scene():
    """Sum of all sources, without reverberation; a narrow hollow cuts the drill and bit."""
    others = background() + bump() + knocks() + ticks() + strain() + draught() + squeals()
    tool = cutting() + drill()
    depth = np.clip(in_time(HOLLOW_DEPTH)[0], 0, 1)
    return others + tool - depth * resonance(tool, HOLLOW_HZ, HOLLOW_WIDTH_HZ)


def record(dry):
    """Clip at full scale, then a steep low-pass."""
    lowpass = signal.ellip(12, .1, 80, CUTOFF_HZ, fs=SR, output="sos")
    return signal.sosfilt(lowpass, np.clip(dry, -1, 1))


dry = scene()
out = record(dry)
wrap_up_sound(out)
```